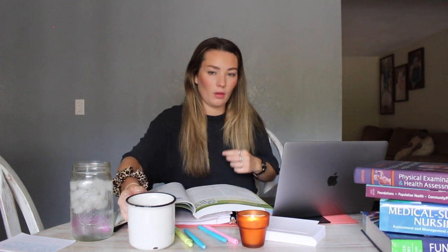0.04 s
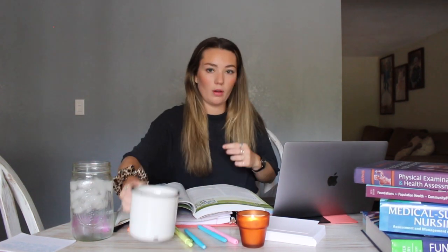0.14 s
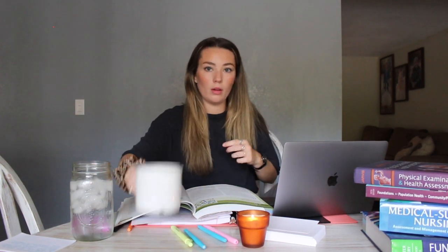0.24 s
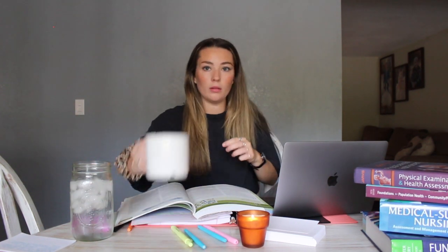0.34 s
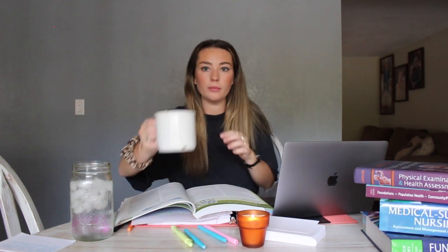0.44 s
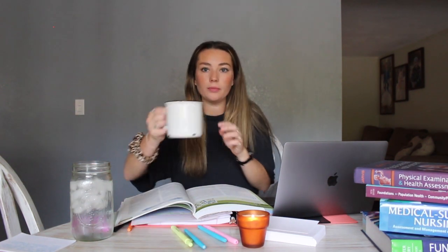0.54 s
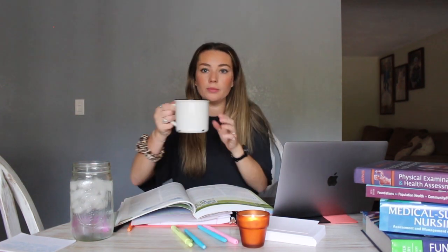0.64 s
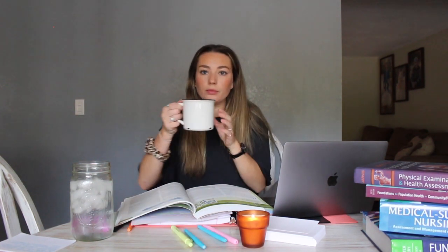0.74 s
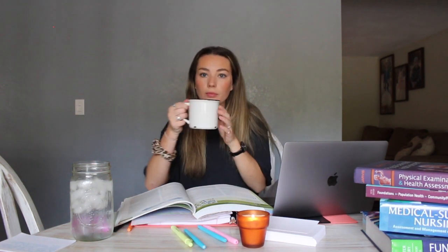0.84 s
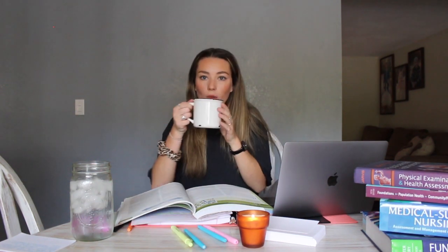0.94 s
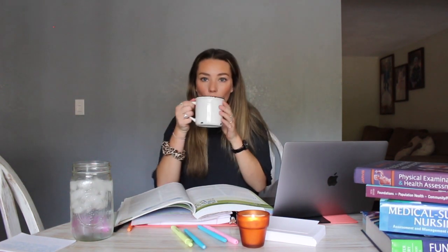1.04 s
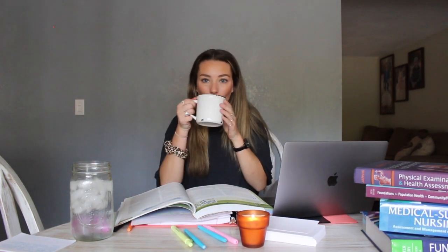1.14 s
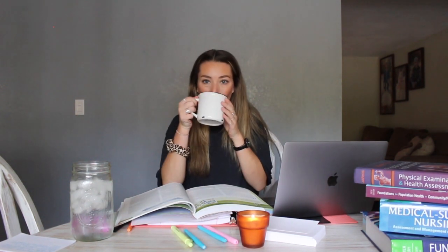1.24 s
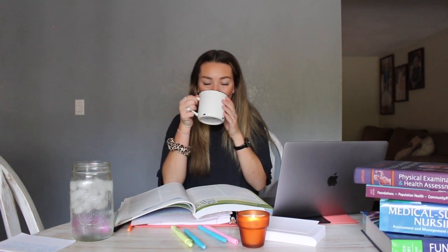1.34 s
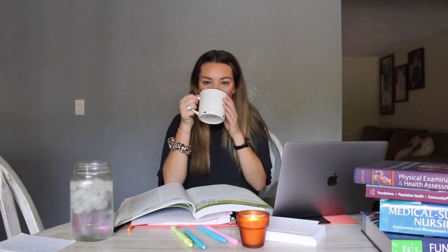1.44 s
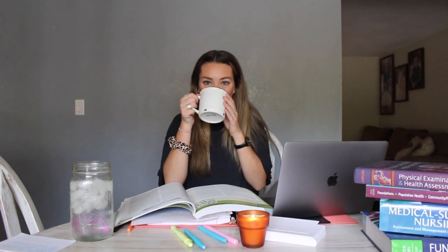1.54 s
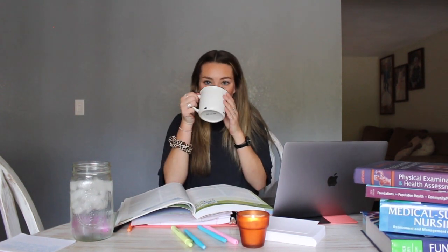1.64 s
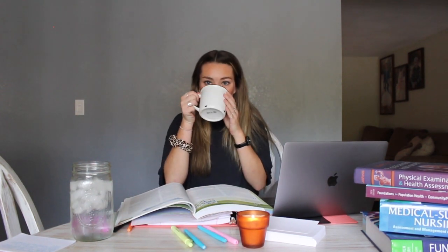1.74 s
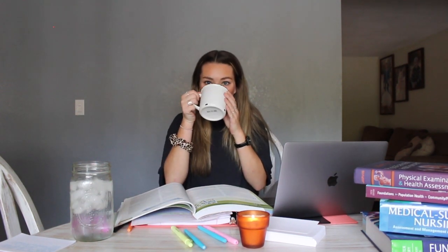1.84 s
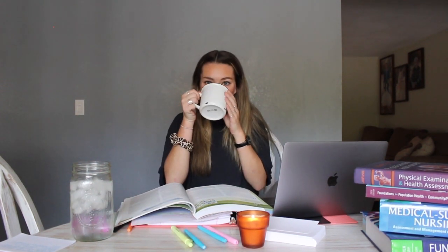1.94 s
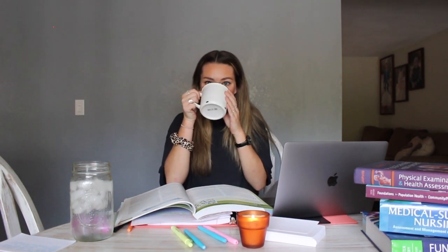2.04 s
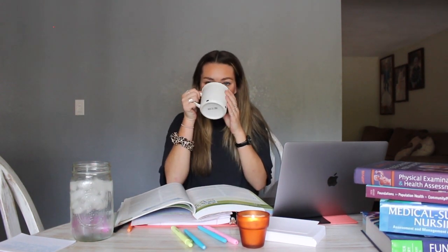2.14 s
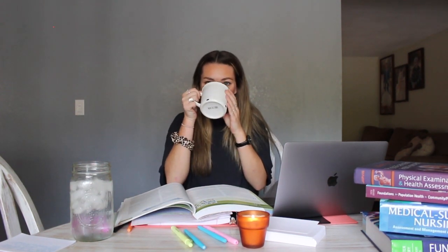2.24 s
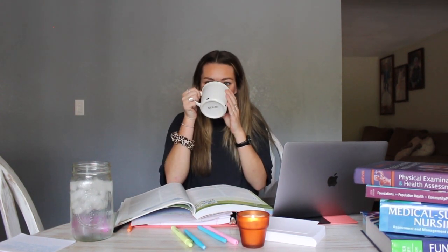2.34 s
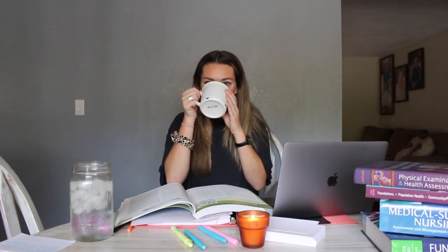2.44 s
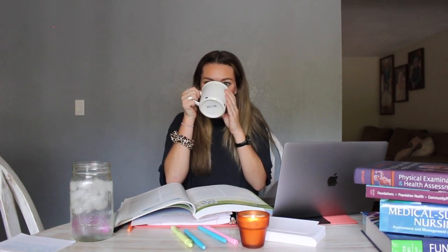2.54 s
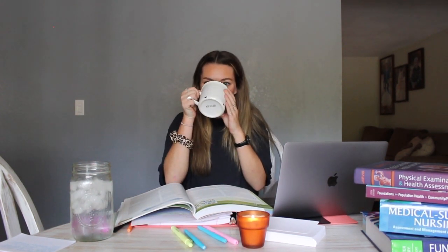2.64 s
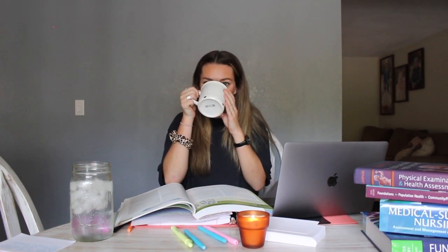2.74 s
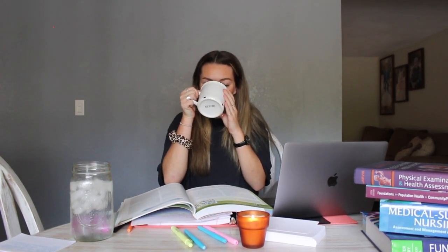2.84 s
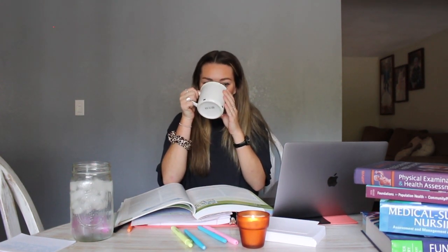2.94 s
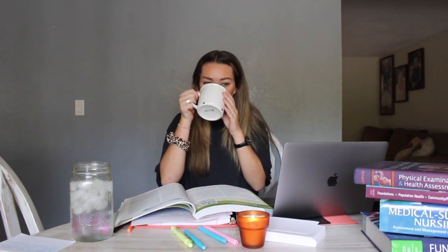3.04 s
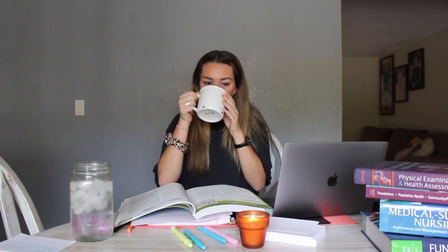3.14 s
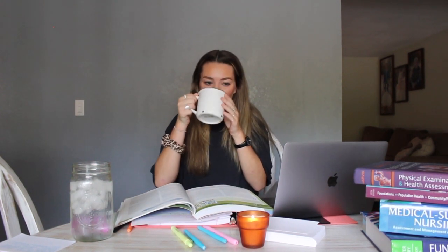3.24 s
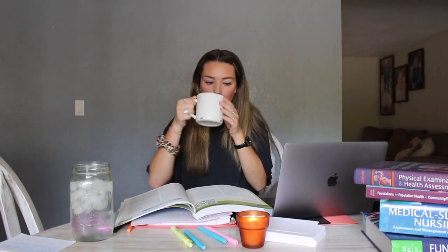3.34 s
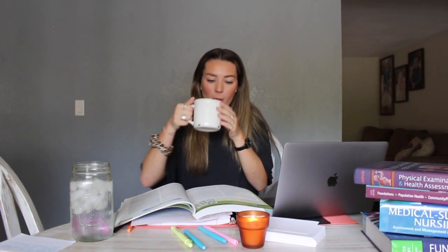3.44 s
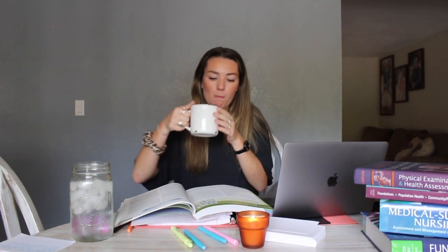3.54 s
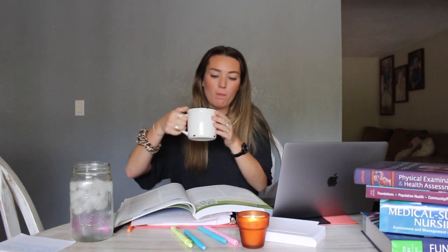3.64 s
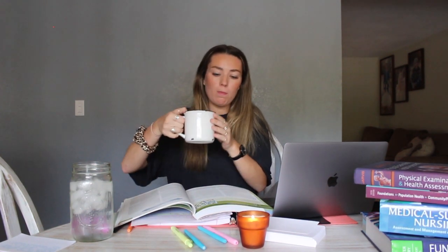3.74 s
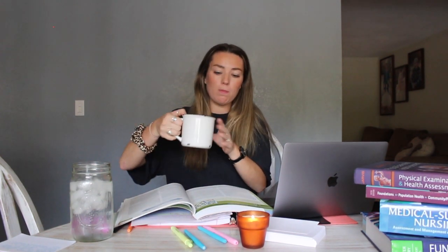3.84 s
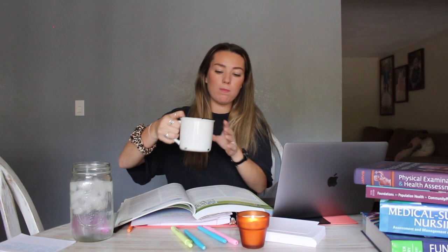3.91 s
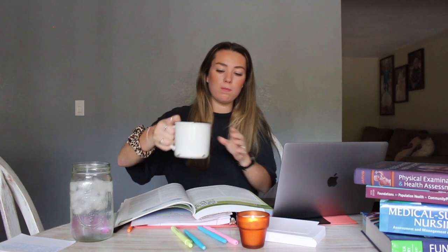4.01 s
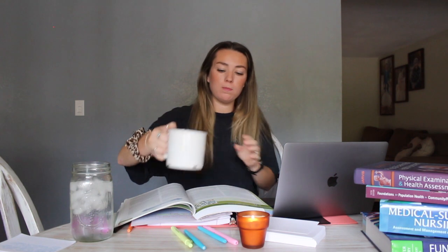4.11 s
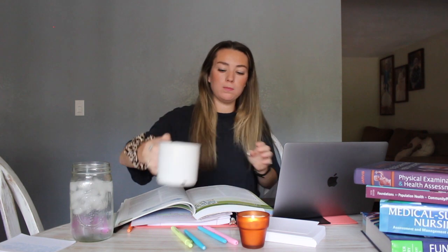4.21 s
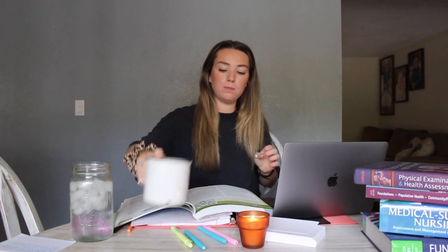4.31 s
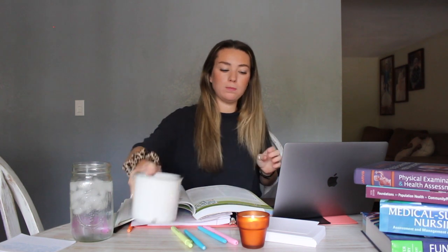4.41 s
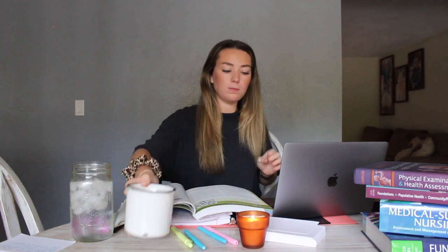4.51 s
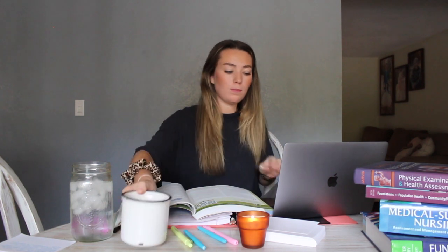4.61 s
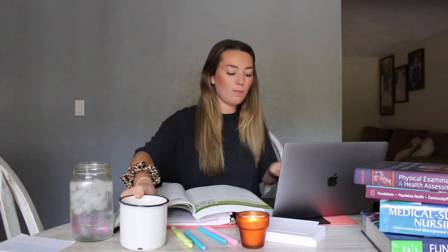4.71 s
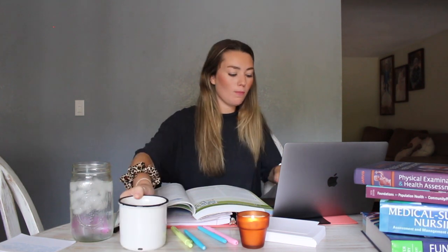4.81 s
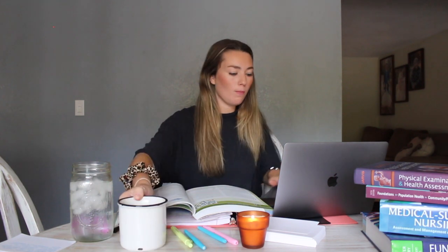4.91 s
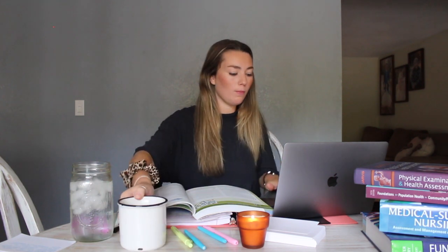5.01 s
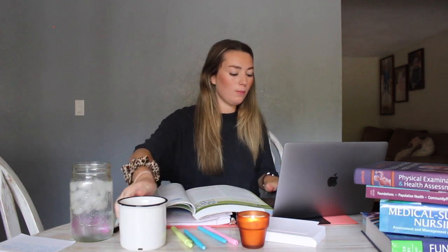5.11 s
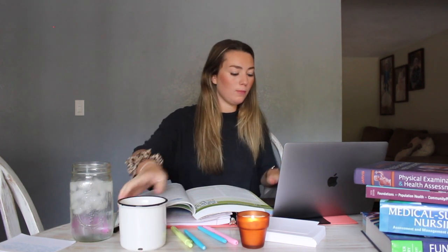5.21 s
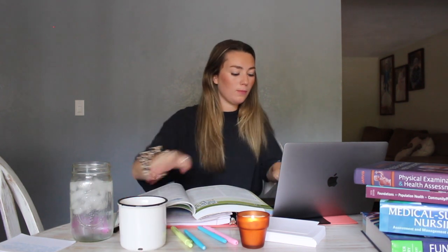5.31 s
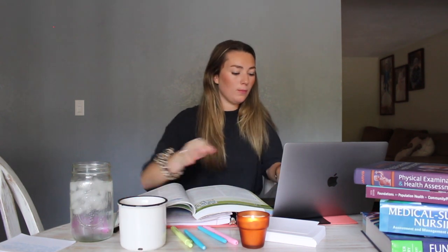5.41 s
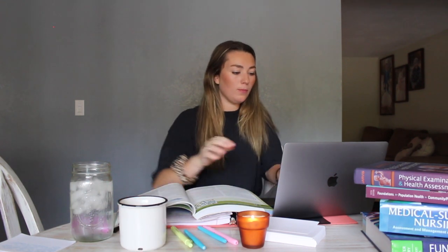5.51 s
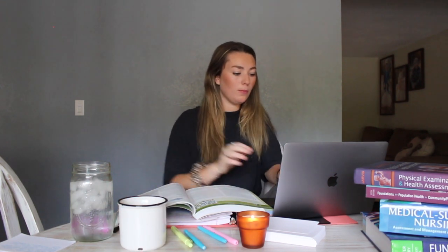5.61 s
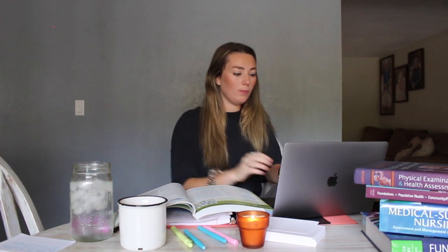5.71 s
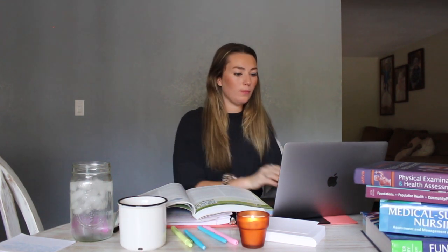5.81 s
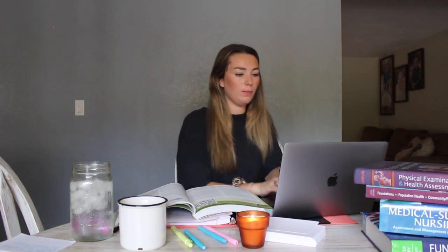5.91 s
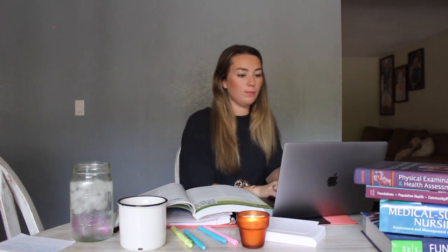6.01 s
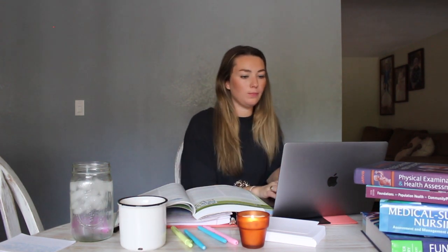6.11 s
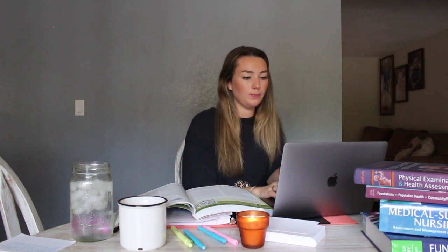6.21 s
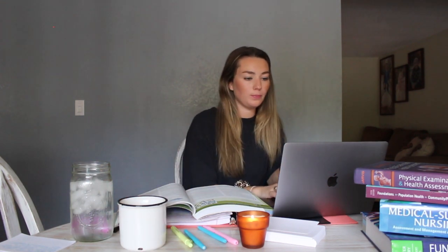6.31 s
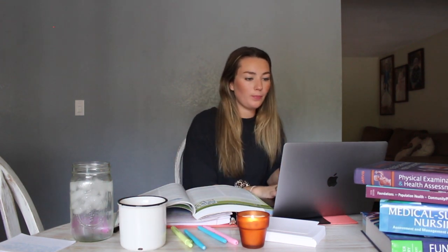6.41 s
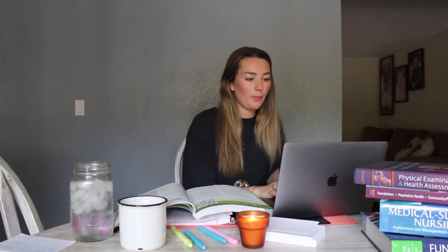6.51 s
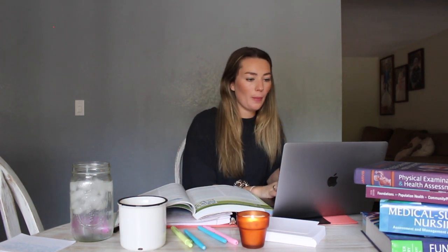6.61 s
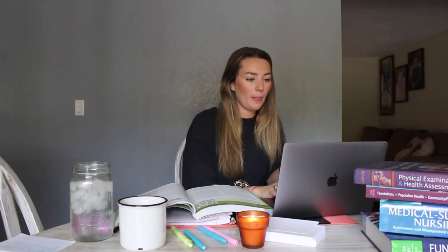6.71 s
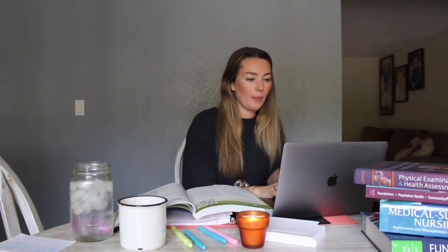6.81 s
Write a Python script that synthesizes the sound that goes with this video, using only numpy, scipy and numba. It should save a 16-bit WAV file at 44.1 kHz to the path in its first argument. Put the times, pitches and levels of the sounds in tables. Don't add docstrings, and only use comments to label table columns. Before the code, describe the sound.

In a bare, echoing room, an enamel mug scrapes free of a wooden table with small low knocks. Cloth rustles, enamel clinks faintly, and liquid sloshes and is sipped. The mug is then banged down, by far the loudest event, with rapid bounces and settling taps. A wrist knocks a laptop edge and forearms land softly. The camera's own microphones pick up constant focus ticks, hum and hiss.

```python
import sys
import numpy as np
from scipy import signal
from scipy.fft import rfft, irfft, next_fast_len
from scipy.io import wavfile
from scipy.ndimage import map_coordinates
from numba import njit

SR = 44100
rng = np.random.default_rng(int(sys.argv[2]) if len(sys.argv) > 2 else 0)


def elevation(decibels):
    levels = np.asarray(decibels, float)
    return 10 ** (levels / 20)


def digitize_waveform(pressure):
    field = np.atleast_2d(pressure).T
    bounded = np.clip(field, -1, 1)
    quanta = np.round(bounded * 32767).astype(np.int16)
    wavfile.write(sys.argv[1], SR, quanta)


N = 302173

# frequency in Hz, level in dB per Hz.
HUM_SPECTRUM = [(12, -32), (25, -10.5), (52, -1.5), (80, -12), (122, 0.5), (190, -17), (275, -6), (365, -7),
                (500, -13), (650, -14.5), (1010, -11.5), (1500, -25.5), (3000, -51), (6000, -120)]
# frequency in Hz, likeness (1 is the same).
HUM_LIKENESS = [(35, 0.92), (90, 0.63), (200, 0.17), (1000, .35)]
# frequency in Hz, left minus right in dB.
HUM_LEAN = [(60, -3.3), (200, -1.5)]
# frequency in Hz, level in dB per Hz.
HISS_SPECTRUM = [(50, -4), (200, 7), (1400, 6), (1940, 2.5), (2560, 2), (4500, -1), (9000, -7),
                 (16000, -15.5)]
# frequency in Hz, likeness (below 0 is opposed).
HISS_LIKENESS = [(900, -0.16), (1600, -0.56), (2800, -0.44), (5000, -0.29), (9000, -0.1)]

# frequency in Hz, level in dB, time to fall 60 dB in seconds.
ROOM_BOOM = [(144, -4, 0.8), (194.6, 3, 0.088), (239, -15, 0.58), (289, -15.5, 0.25)]
# frequency in Hz, time to fall 60 dB in seconds, left-right likeness.
ROOM_ECHO = [(150, 0.73, 0.72), (500, 0.48, 0.98), (1200, 0.61, 0.78), (3000, 0.57, 0.67),
             (8000, 0.52, 0.3)]

# crest in seconds, rise in seconds, fall in seconds, level in dB.
CLOTH_RUBS = [(.01, .01, 0.23, -67), (.3, .03, .04, -66), (.38, .05, 0.062, -69.5), (.51, .05, .07, -70),
              (.63, .06, .04, -70), (.95, .3, .5, -66), (1.23, .05, 0.036, -67.5), (1.94, .08, .03, -62.5),
              (2.68, .05, .12, -64), (2.83, .04, 0.45, -67), (3.26, .15, 0.054, -71),
              (3.72, .02, 0.092, -71), (3.91, .12, 0.32, -67), (5.0, .02, .25, -63), (5.448, .35, .08, -66),
              (5.548, .02, 0.027, -69), (5.596, .02, .01, -72), (6.0, .4, .02, -62.5),
              (6.072, .08, .15, -78), (6.554, .01, .3, -71)]
# crest in seconds, rise in seconds, fall in seconds, level in dB.
SLOSHES = [
    (2.66, 0.13, .1, -59),
    (2.75, .1, .1, -52),
    (6.58, 0.037, 0.13, -52),
]
# crest in seconds, rise in seconds, fall in seconds, level in dB.
SIPS = [
    (2.5, .03, 0.22, -68),
    (2.7, .1, .12, -66),
    (2.95, .1, .02, -67),
]
# start in seconds, peak in dB, frequency in Hz, time to fall 60 dB in seconds, width in Hz.
ENAMEL_CLINKS = [(0.385, -43.5, 6060, 0.02, 3000), (0.7174, -43, 1470, 0.028, 500),
                 (0.9736, -40, 4030, 0.064, 900), (2.8954, -49, 4530, 0.05, 500),
                 (2.979, -50.5, 2940, 0.037, 500), (3.2402, -45.5, 1410, 0.061, 500),
                 (3.8994, -50, 1870, 0.07, 500), (4.2936, -52, 2480, 0.05, 500),
                 (6.5654, -48.5, 4770, 0.055, 500), (0.834, -51, 1860, 0.11, 120),
                 (0.9178, -52, 2430, 0.05, 120), (1.1194, -47.5, 2600, 0.03, 200),
                 (1.1194, -54, 1960, 0.12, 80), (1.905, -50, 4600, .04, 500),
                 (2.5127, -49, 2300, 0.071, 120), (2.5855, -50, 2300, 0.074, 120),
                 (2.6294, -57, 2520, 0.05, 120), (2.6844, -65, 2270, 0.05, 120),
                 (2.7501, -47, 2380, 0.048, 120), (5.2094, -51.5, 1930, 0.054, 120)]

# start in seconds, peak in dB,
# snap over it in dB.
FOCUS_STEPS = [(0.29, -40.5, -2), (0.488, -35, -13.5), (0.51, -35.5, -7), (0.716, -43.5, 0),
               (0.868, -38, -12), (1.135, -42.5, -4), (1.172, -36.5, -4), (1.224, -40, -4),
               (1.253, -43, -9), (1.456, -48.5, 8), (1.584, -40.5, -17), (1.727, -39, -4), (1.896, -48, 7),
               (1.929, -37, -19), (2.027, -46.5, 0), (2.17, -48.5, 8), (2.233, -47, -11), (2.324, -46, -12),
               (2.574, -44, -7), (2.816, -44, 3), (2.903, -47.5, 6), (3.049, -42, -14), (3.246, -38, -5),
               (3.296, -42.5, -10), (3.635, -42, -16), (3.679, -40.5, -9), (3.707, -40, -2),
               (3.854, -43, -10), (4.305, -43.5, 3), (4.368, -37, -14),
               (5.206, -42, -1.5), (5.275, -44.5, -12), (5.378, -39.5, -16), (5.436, -46, -17),
              (5.538, -40, 2.5), (5.788, -46, -10), (5.812, -40, -13), (5.855, -43, -14),
              (5.943, -41.5, -6), (5.975, -46, -11), (6.036, -43, -2), (6.074, -50, -2), (6.1, -41, -18),
              (6.133, -44, -18), (6.252, -35, -7), (6.2657, -34, -14), (6.295, -46, -12), (5.916, -47, -12),
              (6.406, -43, -17), (6.466, -40.5, -18), (6.52, -42, -22), (6.617, -42, -16),
              (6.654, -35, -20), (6.743, -42, -11), (6.792, -37.5, -15), (6.812, -36.5, -17),
              (6.84, -41, -15)]
TICK_FRAMES = [0, 2, 5, 7]
TICK_LEVELS = [-43.5, -43, -43.5, -43.5]

# start in seconds, peak in dB, contact in ms, table thump in dB, room in dB.
WRIST_KNOCKS = [
    (5.6305, -38.5, 0.026, 2, -4),
    (5.6328, -23.5, 0.085, -26, -6.5),
    (5.6355, -29, 0.2, -3, 0),
    (5.6385, -24.5, 0.058, -0.5, -5),
    (5.71, -47, 0.02, 21.5, 3.5),
]
# frequency in Hz, width in Hz, level in dB.
LAPTOP_CASE = [(340, 100, -11), (1450, 500, -1), (2300, 1140, -2.5), (5300, 2600, 2)]
# frequency in Hz, level in dB, time to fall 60 dB in seconds.
LAPTOP_SHELL = [(358, 0.5, 0.22)]

# start in seconds, peak in dB, contact in ms, table thump in dB, room in dB.
LIFT_CONTACTS = [
    (0.047, -36, 1, 7, 9),
    (0.058, -31.5, 0.27, 17.5, 10.5),
    (0.0655, -22, 0.38, 6.5, 1.5),
    (0.071, -30, 0.28, -5, 4),
    (0.087, -27, 0.23, 4, -1),
    (0.1055, -30, 0.13, -11, -9),
    (6.0, -47, 0.72, 15.5, 4.5),
    (6.405, -44, 0.64, 7, 4.5),
]
# start in seconds, peak in dB, contact in ms, table thump in dB, room in dB.
SET_DOWN = [
    (4.7335, -38, 0.12, -5, -20),
    (4.7418, 1.5, .13, -4, -2.5),
    (4.7437, -6.5, 0.12, -36, -0.5),
    (4.7464, -6, 0.11, -10.5, 0),
    (4.7878, -9, 0.12, -8.5, 5),
]
# start in seconds, peak in dB, contact in ms, table thump in dB, room in dB.
SETTLING = [
    (4.836, -16.5, 0.14, -10, 2),
    (4.902, -23, 0.13, -10, 2),
]
# frequency in Hz, width in Hz, level in dB.
TABLE_BODY = [(142, 68, -9), (402, 92, 2.5), (840, 500, 0), (1265, 340, 3.5), (2600, 7100, -9)]
# frequency in Hz, width in Hz, level in dB.
MUG_BASE = [(148.6, 36, -15), (446, 156, -3), (640, 210, -4), (1600, 1400, -8.5)]
# frequency in Hz, level in dB, time to fall 60 dB in seconds.
TABLE_TOP = [(408, 0, .35), (447, -3, .35), (511, -3, .4), (603, -7, .4)]
# frequency in Hz, level in dB, time to fall 60 dB in seconds.
FOOT_BLOW = [(413, 22, 0.05), (1120, 15, 0.044)]
# frequency in Hz, level in dB, time to fall 60 dB in seconds.
FOOT_ROCKING = [(448, 4.5, .2), (718, -3.5, 0.26)]

LEFT_RIGHT = np.array([[0.5], [-0.5]])
LAG_S = 1.1e-4
HUM_DB, HISS_DB = -56.5, -54.5
HISS_DUCKS = 0.35
SWELL_DB = 17
HOUSING_HZ, HOUSING_SCATTER = 1046, 0.022
THUD_DB, THUD_SCATTER_DB = -51.5, 1.5
RING_PAN_DB, THUD_PAN_DB = 3, -6
CREEP_PER_S, CREEP_DB, CREEP_SCATTER_DB = 4.6, -51, 3
FRAME_S, CYCLE_FRAMES = 1 / 29.97, 9
GEAR_LATE_S, GEAR_SCATTER_DB = -0.00098, 1.5


def unit(x):
    return x / np.sqrt(np.mean(x ** 2) + 1e-20)


def along(points, hz):
    f, v = np.transpose(points)
    return np.interp(np.log(hz + 1), np.log(f + 1), v)


def wobble(rate):
    knots = rng.standard_normal(int(N * rate / SR) + 4)
    return map_coordinates(knots, [np.arange(N) * rate / SR])


def filtered(x, response):
    n = x.shape[-1]
    m = next_fast_len(n + SR // 4)
    return irfft(rfft(x, m) * response(np.fft.rfftfreq(m, 1 / SR)), m)[..., :n]


def resonances(modes):
    def response(f):
        total = 0
        for k, (center, width, db) in enumerate(modes):
            drag = 1j * f * width
            total = total + (-1) ** k * elevation(db) * drag / (center * center - f * f + drag)
        return total
    return response


def ring(modes, t, attack_s):
    tones = sum(elevation(db - 60 * t / t60) * np.sin(2 * np.pi * hz * t) for hz, db, t60 in modes)
    return tones * (1 - np.exp(-t / attack_s))


def ping(hz, t60, attack_s):
    return ring([(hz, 0, t60)], np.arange(SR // 10) / SR, attack_s)


def swells(rows):
    t = np.arange(0, N / SR, 0.001)
    gain = 0
    for s, rise, fall, db in rows:
        away = np.maximum((s - t) / max(rise, 0.003), (t - s) / max(fall, 0.003))
        gain = gain + elevation(db - SWELL_DB * away)
    return np.interp(np.arange(N) / SR, t, gain)


def spread(mid_side, likeness):
    turn = np.arccos(likeness) / 2
    mid, side = mid_side * np.array([np.cos(turn), np.sin(turn)])
    return np.array([mid + side, mid - side])


def noise(spectrum, alike):
    def response(hz):
        turn = np.arccos(np.clip(along(alike, hz), -1, 1)) / 2
        return elevation(along(spectrum, hz)) * np.array([np.cos(turn), np.sin(turn)])
    mid, side = filtered(rng.standard_normal((2, N)), response)
    return unit(np.array([mid + side, mid - side]))


def add(out, s, x):
    at = round(s * SR)
    out[..., at:at + x.shape[-1]] += x[..., :N - at]


def room(onset_s):
    hz, t, z = signal.stft(rng.standard_normal((2, SR)), SR, nperseg=256)
    t60 = along([(row[0], row[1]) for row in ROOM_ECHO], hz)[:, None]
    alike = along([(row[0], row[2]) for row in ROOM_ECHO], hz)[:, None]
    both = spread(z * elevation(-60 * t / t60), np.clip(alike, 0, 1))
    tail = signal.istft(both, SR, nperseg=256)[1][:, :SR]
    tail = tail / np.linalg.norm(tail, axis=1)[:, None]
    return tail * np.clip(np.arange(SR) / SR / onset_s, 0, 1)


def preamp_hiss():
    return elevation(HISS_DB) * noise(HISS_SPECTRUM, HISS_LIKENESS)


def ventilation():
    hum = noise(HUM_SPECTRUM, HUM_LIKENESS)
    hum = filtered(hum, lambda hz: elevation(along(HUM_LEAN, hz) * LEFT_RIGHT))
    return elevation(HUM_DB + 0.4 * wobble(17)) * hum


def rustle():
    cloth = noise([(600, -33.5), (1800, 4), (4000, 4.0), (8000, -7.5), (14000, -14.5)],
                  [(2000, 0.18), (8000, 0.1)])
    return elevation(5.5) * swells(CLOTH_RUBS) * unit(cloth * elevation(2.3 * wobble(160)))


def slosh_and_sip():
    low = filtered(rng.standard_normal(N), resonances([(364, 24, 7), (490, 100, -2.5), (854, 63, 0.5)]))
    high = filtered(rng.standard_normal(N), resonances([(2440, 230, 0)]))
    liquid = swells(SLOSHES) * unit(low * elevation(2.6 * wobble(40)))
    sips = swells(SIPS) * unit(high * elevation(3.6 * wobble(40)))
    return liquid + sips


def clinks():
    out, t = np.zeros(N), np.arange(SR // 8) / SR
    for s, db, hz, t60, width_hz in ENAMEL_CLINKS:
        puff = rng.standard_normal(len(t)) * elevation(-60 * t / max(t60, 0.004))
        puff = filtered(puff, resonances([(hz, max(width_hz, 30), 0)]))
        add(out, s, elevation(db) * puff / np.max(np.abs(puff)))
    echo = signal.fftconvolve(out[None], room(onset_s=0.0043), axes=1)[:, :N]
    return out + elevation(-3.5) * echo


def creeping_steps():
    times = np.cumsum(rng.exponential(1 / CREEP_PER_S, 60))
    return [(s, CREEP_DB + CREEP_SCATTER_DB * rng.standard_normal(), -9) for s in times if s < N / SR]


def focus_motor():
    out = np.zeros((2, N))
    for s, db, snap_db in FOCUS_STEPS + creeping_steps():
        hz = HOUSING_HZ * (1 + HOUSING_SCATTER * rng.standard_normal())
        housing = ping(hz, 0.029, 0.00014) + 0.45 * ping(1260, 0.007, 0.00023)
        thud_db = THUD_DB + THUD_SCATTER_DB * rng.standard_normal()
        snap = ping(3260, 0.025, 0.0001) + 0.7 * ping(1960, 0.012, 0.0001)
        add(out, s, elevation(db + 0.5 + RING_PAN_DB * LEFT_RIGHT) * housing)
        add(out, s, elevation(thud_db + THUD_PAN_DB * LEFT_RIGHT) * ping(394, 0.021, 0.00015))
        add(out, s, elevation(db + snap_db - 5) * snap)
    return out


def focus_gear():
    out = np.zeros((2, N))
    for first in range(0, int(N / SR / FRAME_S), CYCLE_FRAMES):
        for frame, db in zip(TICK_FRAMES, TICK_LEVELS):
            s = np.clip((first + frame) * FRAME_S + GEAR_LATE_S, 0, (N - 1) / SR)
            tick_db = db + GEAR_SCATTER_DB * rng.standard_normal() + 3.5
            add(out, s, elevation(tick_db) * ping(640, 0.028, 0.0037))
    return out


def between_ports(near):
    return filtered(near, lambda hz: np.exp(2j * np.pi * hz * LAG_S * LEFT_RIGHT))


def impacts(events, body, modes, direct_db, wet_db, boom_db, ring_db, crack_db, rattle, damping, pan_db):
    out, t = np.zeros((2, N)), np.arange(SR) / SR
    early = t[:SR // 8]
    body_ring = ring(modes, t, 0.0036)
    boom = ring(ROOM_BOOM, t, 0.004) * elevation(-damping * t)
    for s, db, ms, thump_db, room_db in events:
        contact_ms = max(ms, 0.02)
        u = early / (contact_ms / 1000)
        push = u ** 2 * np.exp(-u)
        shake = rattle * rng.standard_normal(len(u)) * elevation(-60 * early / 0.031)
        rough_push = push + signal.fftconvolve(shake, push)[:len(u)]
        hit = filtered(rough_push, resonances(body))
        hit = hit / np.max(np.abs(hit))
        slap = filtered(push, resonances([(616, 1240, 0)]))
        slap = slap / np.max(slap)
        crack = filtered(rng.standard_normal(len(u)), resonances([(8000, 12000, 0.012)]))
        crack = crack * elevation(crack_db - 60 * early / 0.067) / contact_ms
        tail = signal.fftconvolve(hit[None], room(onset_s=0.0016), axes=1)[:, :SR]
        add(out, s, elevation(db + direct_db) * (0.68 * hit + 0.69 * slap + crack))
        add(out, s, elevation(db + room_db) * (elevation(wet_db) * tail + elevation(ring_db) * body_ring))
        add(out, s, elevation(db + boom_db + thump_db) * boom)
    out = filtered(out, lambda hz: (1j * hz / (120 + 1j * hz)) ** 2)
    return out * elevation(pan_db * LEFT_RIGHT)


def wrist_on_laptop():
    return impacts(WRIST_KNOCKS, LAPTOP_CASE, LAPTOP_SHELL, direct_db=4.5, wet_db=8, boom_db=-10.5,
                   ring_db=-17, crack_db=-61, rattle=0.14, damping=4.5, pan_db=-1.5)


def mug_lift():
    return impacts(LIFT_CONTACTS, MUG_BASE, TABLE_TOP + FOOT_ROCKING, direct_db=-0.5, wet_db=-1.5,
                   boom_db=-13.0, ring_db=-21.5, crack_db=-57, rattle=0.01, damping=25, pan_db=-2.0)


def mug_set_down():
    return impacts(SET_DOWN, TABLE_BODY, TABLE_TOP + FOOT_BLOW, direct_db=1.0, wet_db=8, boom_db=-7.0,
                   ring_db=-23, crack_db=-68, rattle=0.024, damping=2.2, pan_db=-1.2)


def mug_settling():
    return impacts(SETTLING, TABLE_BODY, TABLE_TOP, direct_db=0.0, wet_db=7.5, boom_db=-11,
                   ring_db=-23, crack_db=-68, rattle=0.024, damping=2.2, pan_db=-0.5)


def scene():
    near = between_ports(ventilation() + focus_motor() + focus_gear())
    handling = rustle() + slosh_and_sip() + clinks()
    mug = mug_lift() + mug_set_down() + mug_settling()
    return near + handling + wrist_on_laptop() + mug


@njit
def follow(level, up, down):
    out, e = np.empty_like(level), 0.0
    for i in range(len(level)):
        e += (level[i] - e) * (up if level[i] > e else down)
        out[i] = e
    return out


def low_pass(x):
    return signal.sosfilt(signal.butter(12, 15730, fs=SR, output="sos"), x)


def record(dry):
    level = follow(np.max(np.abs(dry), axis=0), 1 / (0.0038 * SR), 1 / (0.09 * SR))
    knee = elevation(-14)
    gain = (1 + (level / knee) ** 2) ** -0.3
    mix = dry * gain + gain ** HISS_DUCKS * preamp_hiss()
    return low_pass(np.clip(mix, -1, 1))


dry = scene()
out = record(dry)
digitize_waveform(out)
```